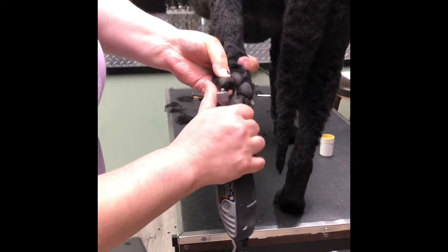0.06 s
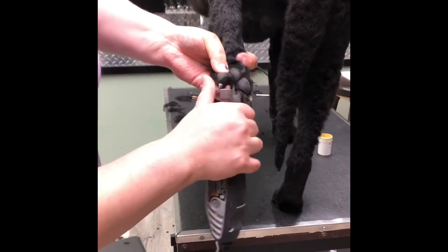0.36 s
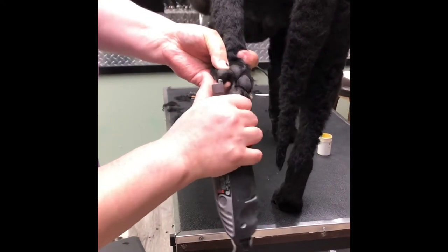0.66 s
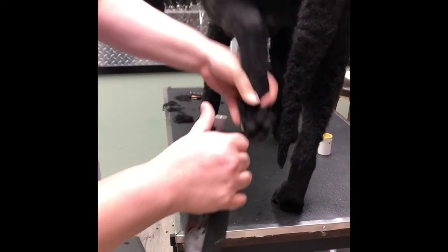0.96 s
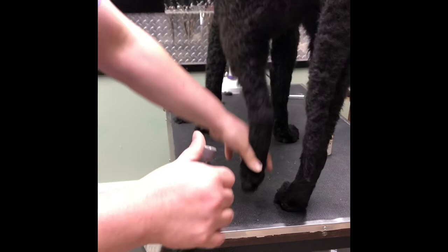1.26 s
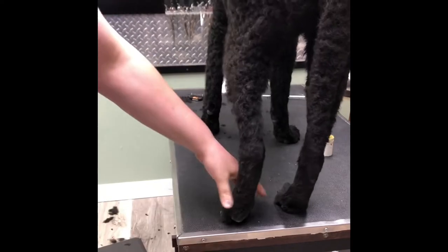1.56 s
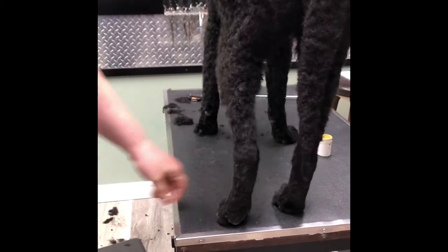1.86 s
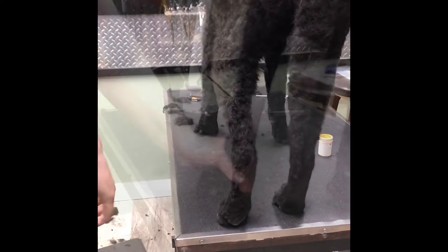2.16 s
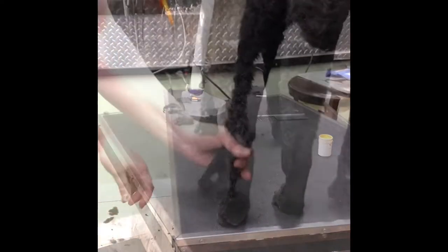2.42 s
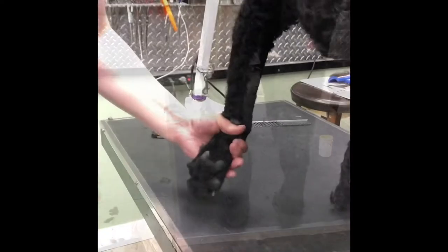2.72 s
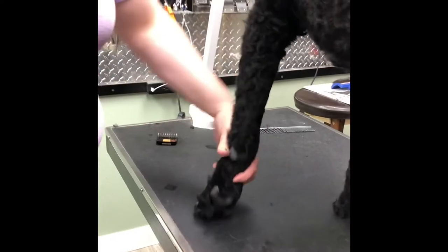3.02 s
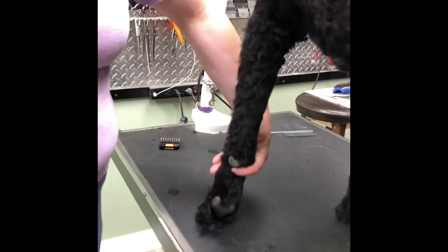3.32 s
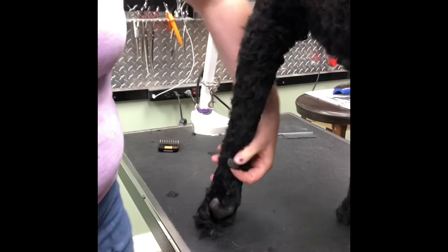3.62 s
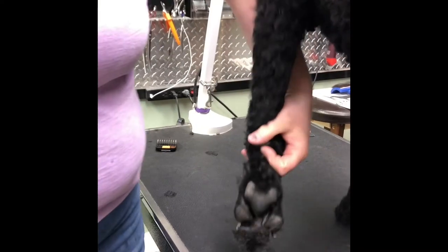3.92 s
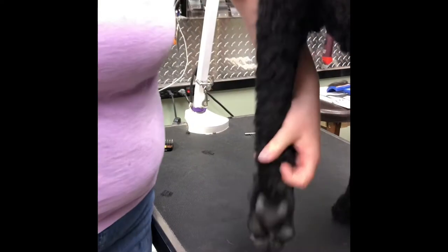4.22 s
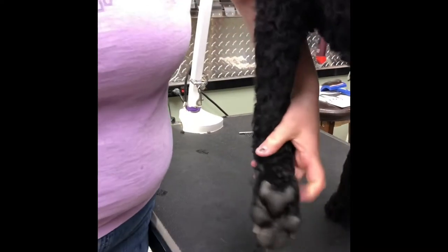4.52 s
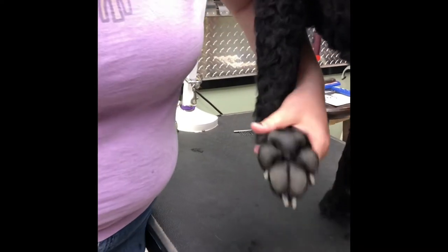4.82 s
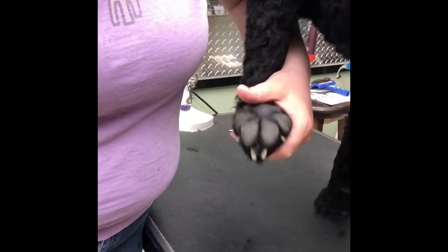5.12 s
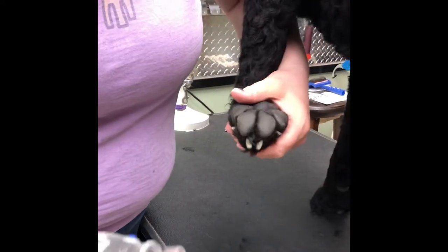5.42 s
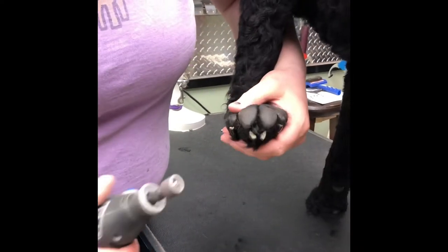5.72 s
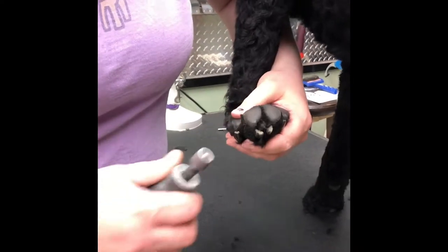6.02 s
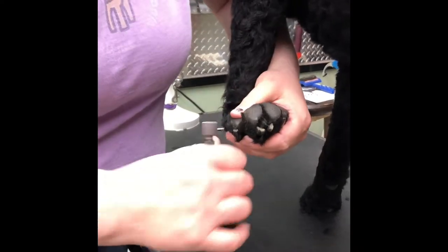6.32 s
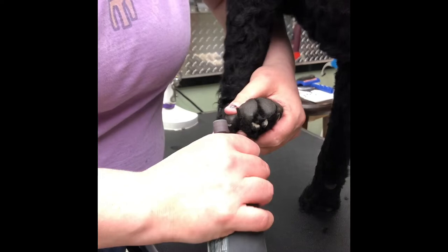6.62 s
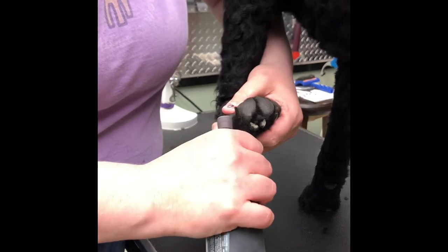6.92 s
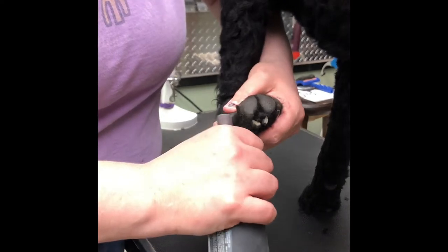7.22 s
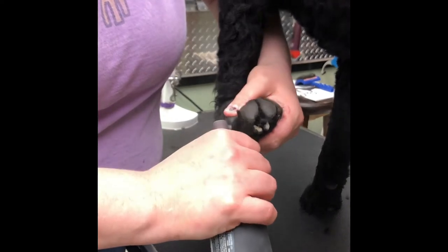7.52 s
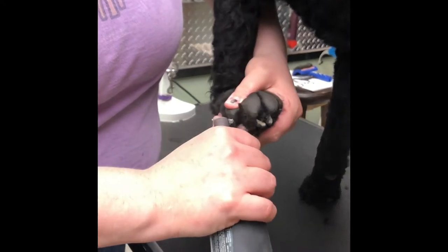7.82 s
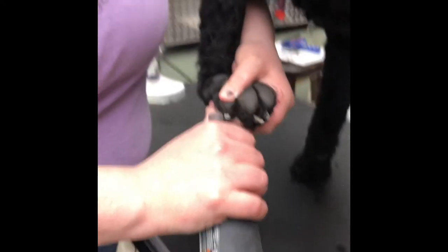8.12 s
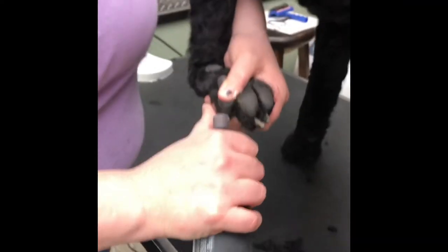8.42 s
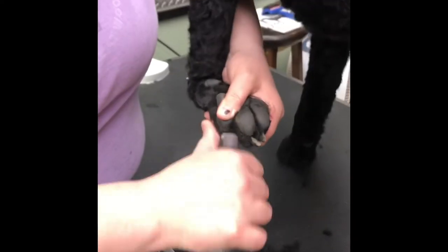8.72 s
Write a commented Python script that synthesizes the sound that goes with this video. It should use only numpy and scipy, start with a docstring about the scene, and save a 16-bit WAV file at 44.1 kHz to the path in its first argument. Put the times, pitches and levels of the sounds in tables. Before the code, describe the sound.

A handheld rotary grinder whines against a dog's nails, coasts into silence, then judders up to a higher speed and files again.

```python
"""A handheld rotary grinder files a dog's nails, close by, over the low hum of a room. From the start its shaft
hums and its fan hisses and whines; the sanding drum rasps, squeals and slows as it meets a nail. Near 2 s it is
switched off and coasts down as its sound fades away. A paw shifts on the grooming table, with a few small
ticks. At 5.2 s the motor judders up to a higher speed, and from about 7 s the drum files again, pressed harder."""
import sys
import numpy as np
from scipy import signal
from scipy.fft import rfft, irfft
from scipy.io import wavfile

SR = 44100
rng = np.random.default_rng(int(sys.argv[2]) if len(sys.argv) > 2 else 0)


def dump_mix(stems):
    """Bounce the given channels to the path in sys.argv[1] as a 16-bit WAV at rate SR."""
    frames = np.atleast_2d(stems).T  # one column per channel
    limited = np.clip(frames, -1, 1)  # hard clip at full scale
    pcm = np.round(limited * 32767).astype(np.int16)
    wavfile.write(sys.argv[1], SR, pcm)


N = 395136
TIME = np.arange(N) / SR
FREQS = np.fft.rfftfreq(N, 1 / SR)


def amp(db):
    """Turns decibels into a gain to multiply by."""
    return 10 ** (np.asarray(db) / 20)


def unit(x):
    """Scales a signal to an average strength (rms) of one."""
    return x / np.sqrt(np.mean(x ** 2) + 1e-20)


def curves(rows):
    """Joins the rows of a timed table with straight lines, one curve a column."""
    times, *columns = np.transpose(rows)
    return [np.interp(TIME, times, column) for column in columns]


def shape(points):
    """A gain for every frequency, drawn through points of f/Hz, level/dB."""
    hz, db = np.transpose(points)
    return amp(np.interp(np.log(FREQS + 1), np.log(hz), db))


def above(hz, order=8):
    """Gains that let through what lies above hz; a higher order cuts more sharply."""
    return 1 / np.sqrt(1 + (hz / (FREQS + 1)) ** (2 * order))


def noise(gain):
    """Noise coloured by a gain for each frequency."""
    return unit(irfft(gain * rfft(rng.standard_normal(N)), N))


def drift(rate_hz):
    """A smooth random wiggle that changes about rate_hz times a second."""
    steps = signal.lfilter(*signal.butter(3, rate_hz, fs=2000), rng.standard_normal(20000))
    return unit(np.interp(TIME, np.linspace(-1, 9, len(steps)), steps))


def tone(cycles, unsteady, rate_hz):
    """A wavering tone from a running count of cycles; very unsteady, it becomes a band of noise."""
    angle = 2 * np.pi * (cycles + rng.random())
    steady_part = (1 + unsteady * drift(rate_hz)) * np.cos(angle)
    return unit(steady_part + unsteady * drift(rate_hz) * np.sin(angle))


def swell(t, length):
    """A smooth rise and fall with its middle at time t."""
    out = np.zeros(N)
    inside = slice(*np.searchsorted(TIME, [t - length / 2, t + length / 2]))
    out[inside] = np.cos(np.pi * (TIME[inside] - t) / length) ** 2
    return out


def swells(rows):
    """Adds up swells from rows of t/s, length/s, height."""
    return sum(height * swell(t, length) for t, length, height in rows)


# machines humming on mains power: f/Hz, level/dB, unsteadiness (0-1)
MAINS_HUM = [(55.8, -50.5, 0.6), (117.2, -48.5, 0.28), (234.2, -59, 0.03), (352, -61, 0.24),
             (482, -64.5, .6), (608, -65.5, 0.3)]
# colour of the ventilation: f/Hz, level/dB
VENTILATION = [(28, -43.5), (50, -16.5), (130, -9.5), (175, -14), (300, -12.5), (500, -13.5), (900, -19.5),
               (1500, -24), (3700, -30), (6400, -40), (15500, -49)]
def room_tone(ventilation_db=-52, low_cut_hz=46):
    """Machines hum and ventilation blows all the way through, with no deep rumble."""
    hum = sum(amp(db) * tone(hz * TIME, unsteady, rate_hz=11) for hz, db, unsteady in MAINS_HUM)
    ventilation = amp(ventilation_db) * noise(shape(VENTILATION))
    return irfft(rfft(hum + ventilation) * above(low_cut_hz, order=10), N)


# shaft speeds are in Hz, meaning turns a second
WORKING_HZ = 477
SWITCH_OFF_S, SWITCH_ON_S, SETTLE_S = 1.931, 5.2, 0.649
def free_speed(start_hz=399.5, set_hz=473.8, top_hz=556.4, creep_s=1.15, coast_s=2.073,
               kick_share=0.331, kick_s=0.272):
    """With no nail to brake it, the shaft creeps up, coasts down, then restarts with a quick kick."""
    powered = set_hz + (start_hz - set_hz) * np.exp(-np.minimum(TIME, SWITCH_OFF_S) / creep_s)
    first_run = powered * np.exp(-np.maximum(TIME - SWITCH_OFF_S, 0) / coast_s)
    t = np.maximum(TIME - SWITCH_ON_S, 0)
    kick_left = kick_share * np.exp(-(t / kick_s) ** 2)
    settling_left = (1 - kick_share) * np.exp(-t / SETTLE_S)
    return np.where(TIME < SWITCH_ON_S, first_run, top_hz * (1 - kick_left - settling_left))


# pitches that the plastic shell and its vents make louder: f/Hz, width/Hz, lift/dB
SHELL_PEAKS = [(1070, 88, 2), (1230, 55, 3), (2314, 120, 0), (3550, 220, 3.5), (4600, 140, 1.5),
               (5700, 260, 2.5), (6740, 69, 2), (8900, 350, 1.5), (11600, 270, 1.5), (14750, 500, 5.5)]
def shell(hz):
    """The gain the shell gives a sound at hz, highest near its own resonances."""
    grid_hz = np.arange(0, SR // 2, 10)
    lift_db = sum(db / (1 + ((grid_hz - peak) / width) ** 2) for peak, width, db in SHELL_PEAKS)
    return np.interp(hz, grid_hz, amp(lift_db))


# cooling air at working speed, shifting as the tool moves: t/s, rush/dB, hiss/dB, roar/dB
# (the high hiss and the low roar are counted from the rush)
AIR_LEVELS = [(0, -29, -1.5, -4), (1.24, -28.5, -4, -6.5), (1.66, -26.5, 1.7, -5), (2.28, -24, -1.2, -7),
              (2.7, -26, -2.5, -6.5), (5.34, -26, -8.5, -12.5), (5.6, -27, 2, -5.5), (5.78, -23.5, 1, -9),
              (6.04, -24.5, -1, -8), (6.13, -25.5, 2, -7.5), (6.33, -26, 2.5, -4.5),
              (6.92, -25, -1.5, -5.5), (7.7, -26, -1, -4.5), (8.05, -24, -3.5, -6.5), (8.9, -26.5, 0, -6)]
# colour of that air: f/Hz, level/dB
AIR_COLOUR = [(150, -21.5), (600, -11.5), (1000, -3.5), (1750, -5.5), (3000, -4.5), (4200, -3), (6200, 1),
              (7500, 0.5), (10000, -2), (15500, -5.5)]
def airflow(speed, turns, speed_power=1.41, throb=0.26, flutter_db=0.76):
    """Air swirls from the vents, throbbing each turn. Returns its sound and its strength, the rush."""
    rush_db, hiss_db, roar_db = curves(AIR_LEVELS)
    rush = amp(rush_db) * (speed / WORKING_HZ) ** speed_power
    colour = shape(AIR_COLOUR) * shell(FREQS)
    over_roar, over_middle = above(hz=2290), above(hz=10200)
    roar = amp(roar_db - 3) * noise(colour * np.sqrt(1 - over_roar ** 2))
    middle = amp(-0.48) * noise(colour * over_roar * np.sqrt(1 - over_middle ** 2))
    hiss = amp(hiss_db) * noise(colour * over_middle)
    pulsing = (1 + throb * np.cos(2 * np.pi * turns)) * amp(flutter_db * drift(69.5))
    return rush * (roar + middle + hiss) * pulsing, rush


# hum of the shaft, which the shell gives off poorly at low speed: speed/Hz, level/dB
SHAFT_HUM = [(150, -74), (255, -47), (345, -51), (392, -31.5), (520, -31.5)]
# the hum swells and dips as the hand turns the tool: t/s, length/s, change/dB
HUM_CHANGES = [(1.12, 0.51, 4), (1.43, 0.18, -16), (1.57, 0.6, -9.5), (1.99, 0.077, -17), (5.8, .12, 5.5),
               (5.92, 0.21, -5.5), (6.33, 0.38, 4.5), (6.63, 0.38, -6), (6.83, 0.18, -16), (7.13, .25, 3.5),
               (7.95, 0.11, -6), (8.46, .2, 3.5)]
# a slow, a medium and a fast shaft: speed/Hz
THREE_SPEEDS = [382, 419, 535]
# higher tones, counted from the rush at those speeds: cycles a turn, slow/dB, medium/dB, fast/dB
# (whole numbers of cycles come from the shaft, the others from the ball bearings)
ROTOR_TONES = [(2, -24, -18, -14), (3, -22.5, -16.5, -19), (4, -33, -19, -32), (4.56, -37, -38, -7.5),
               (5, -23.5, -23.5, -28.5), (5.66, -33, -21, -34.5), (6.09, -20, -12, -14.5),
               (7.66, -13.5, -18.5, -34), (8, -20, -18, -19), (9.66, -19, -18, -16.5),
               (11.2, -17.5, -44, -18), (11.66, -30, -20, -10), (13, -24, -21.5, -14.5),
               (13.2, -27, -17, -25.5), (16, -33, -25, -22), (17, -19, -16, -20), (19, -18, -19, -23)]
def rotor(speed, turns, rush):
    """The unbalanced shaft hums, one cycle a turn; higher tones swell as they pass a shell peak."""
    hum_db = np.interp(speed, *np.transpose(SHAFT_HUM)) + swells(HUM_CHANGES)
    out = amp(hum_db) * tone(turns, unsteady=0.0504, rate_hz=15)
    for per_turn, *levels_db in ROTOR_TONES:
        level = amp(np.interp(speed, THREE_SPEEDS, levels_db)) * shell(per_turn * speed)
        out += rush * level * tone(per_turn * turns, unsteady=0.299, rate_hz=9)
    return out


# the whine flares when a vent points at the listener: t/s, length/s, lift/dB
WHINE_FLARES = [(1.55, 0.18, 8), (1.74, 0.048, 4.5), (1.93, 1, 7.5), (2.58, 0.58, 4.5), (5.76, 0.21, 10.5),
                (6.02, 0.32, 11), (6.25, 0.096, 8.5), (8.62, 0.19, 6)]
def fan(speed, turns, rush, blades=18, whine_db=-2.5, cutoff_hz=3000, flutter_db=2.5):
    """Passing blades whine; so short a sound wave flutters with each tremor of the hand."""
    passes = blades * turns
    whine = tone(passes, unsteady=0.11, rate_hz=17)
    fuzz = amp(-16) * tone(passes, unsteady=4.6, rate_hz=135)
    octave = amp(-17) * tone(2 * passes, unsteady=0.4, rate_hz=25)
    tremor = unit(amp(flutter_db * drift(21)))
    escaping = np.minimum(blades * speed / cutoff_hz, 1) ** 2
    return rush * escaping * amp(whine_db + swells(WHINE_FLARES)) * (tremor * whine + fuzz + octave)


# the low and the high ring of the housing: f/Hz, width/Hz
HOUSING_RINGS = [(3430, 350), (7120, 360)]
def housing(speed, pull, levels_db=(-32.5, -34.5), speed_power=0.94):
    """The motor's rubbing brushes make the housing ring while the shaft speeds up or runs down."""
    drive = np.minimum(abs(pull), 1) * (speed / WORKING_HZ) ** speed_power
    bands = [noise(1 / (1 + ((FREQS - hz) / width) ** 2)) for hz, width in HOUSING_RINGS]
    return drive * sum(amp(db) * band for db, band in zip(levels_db, bands))


# the drum is pressed on a nail: t/s, length/s, braking/(Hz/s)
NAIL_PRESSES = [(.2, .24, 73), (.62, .16, 115), (6.88, .23, 197), (7.01, .23, 283), (7.23, .23, 300),
                (7.36, .19, 432), (7.62, .49, 268), (7.93, .26, 206), (8.25, .21, 162), (8.66, .29, 155)]
def nail_drag():
    """A nail brakes the drum. Returns the braking and the lost speed, which the motor wins back."""
    braking = swells(NAIL_PRESSES)
    lost_hz = signal.lfilter([1 / SR], [1, -np.exp(-1 / (SETTLE_S * SR))], braking)
    return braking, lost_hz


# the drum just grazes a nail: t/s, length/s, level/dB
NAIL_GRAZES = [(0.06, 0.098, -30), (0.25, .16, -31), (.616, .057, -19.5), (8.686, 0.18, -32),
               (8.753, .06, -18)]
# colour of grit on a nail: f/Hz, level/dB
GRIT_COLOUR = [(1500, -15), (2700, -3), (4000, -5), (6000, 4), (10000, -9.5), (15500, 2)]
def nail_filing(turns, braking, overtones=39, sharpness=5, repeat_share=0.18, rasp_db=-25):
    """A light touch catches the drum's high spot once a turn; pressed down, all its grit rasps."""
    # the same grains come round every turn, so the grit sounds as overtones of the shaft
    spin = np.exp(2j * np.pi * turns)
    weights = np.exp(2j * np.pi * rng.random(overtones)) * rng.uniform(0.4, 1, overtones)
    grit = np.polyval(weights, spin).real
    grit_spectrum = rfft(grit * (1 + 0.16 * drift(120)))
    rasp = unit(irfft(grit_spectrum * shape(GRIT_COLOUR) * above(hz=1400, order=4), N))
    pressure = (braking / 370) ** 0.62  # a firm press brakes by 370 Hz/s
    high_spot = np.exp(sharpness * (spin.real - 1))
    treble = above(hz=12000, order=5)
    scratch = unit(high_spot * noise(treble))
    buzz = unit(irfft(grit_spectrum * treble, N))
    graze = np.sqrt(1 - repeat_share) * scratch + np.sqrt(repeat_share) * buzz
    touch = swells((t, length, amp(db)) for t, length, db in NAIL_GRAZES)
    return touch * graze + amp(rasp_db) * pressure * rasp


# short squeals: t/s, length/s, level/dB, list of tones in cycles a turn
NAIL_SQUEALS = [(.2, .2, -42, [4, 5]), (.6, .13, -37, [5, 37]), (6.98, .17, -33, [3, 5, 10]),
                (7.27, .15, -32.5, [4, 20, 22, 26]), (7.34, .16, -31.5, [12, 16, 20, 23, 26]),
                (7.66, .18, -35, [4, 6, 16, 24]), (8.67, .07, -27, [29])]
def squeals(turns, boost_db=1, unsteady=0.42):
    """The nail sticks and slips in step with the turning drum."""
    out = np.zeros(N)
    for t, length, db, tones in NAIL_SQUEALS:
        chord = sum(np.cos(2 * np.pi * (per_turn * turns + rng.random())) for per_turn in tones)
        out += amp(db) * swell(t, length) * chord
    return amp(boost_db) * np.sqrt(2) * out * unit(1 + unsteady * drift(47))


# gliding bands of air noise: t/s, length/s, level/dB, start f/Hz, end f/Hz
VENT_SWISHES = [(1.5, 0.41, -33, 5560, 4020), (1.665, 0.13, -30.5, 3525, 2196),
                (1.715, 0.58, -28.5, 5700, 6730), (5.867, 0.1, -19.5, 7700, 7970),
                (5.901, .4, -28.5, 3900, 5300)]
def swishes():
    """The jet from the vent sweeps past hand and table as the tool is swung."""
    out = np.zeros(N)
    for t, length, db, start_hz, end_hz in VENT_SWISHES:
        hz = np.interp(TIME, [t - length / 2, t + length / 2], [start_hz, end_hz])
        out += amp(db) * swell(t, length) * tone(np.cumsum(hz) / SR, unsteady=13.3, rate_hz=773)
    return out


# the paw slides: t/s, length/s, level/dB, share of hollow table sound (0-1)
PAW_SCUFFS = [(2.792, .04, -44, 0.9), (3.04, 0.13, -64, 0.1), (3.216, 0.31, -59, 0.1),
              (3.34, 0.15, -51, 0.06), (3.448, 0.093, -60.5, 0), (3.683, 0.32, -52, 0.2),
              (3.726, 0.074, -46.5, 0.3), (3.756, 0.055, -39, 0.98), (4.822, 0.2, -65, 0)]
# colours of rubbed fur and of the hollow table: f/Hz, level/dB
FUR_COLOUR = [(250, -11), (1000, 2), (4500, 4), (7000, 1.5), (11000, -2.5), (15500, -3.5)]
TABLE_COLOUR = [(150, -14.5), (300, 0), (800, -14.5), (1150, 1.5), (1500, -2), (1900, -14), (3200, -16),
                (8000, -41)]
def paw_scuffs(grain_db=0.5):
    """Fur and paw pads rub over the hand and the table's mat with a slightly grainy sound."""
    grain = amp(grain_db * drift(250))
    fur = unit(grain * noise(shape(FUR_COLOUR)))
    table = unit(grain * noise(shape(TABLE_COLOUR)))
    return sum(amp(db) * swell(t, length) * (np.sqrt(1 - hollow) * fur + np.sqrt(hollow) * table)
               for t, length, db, hollow in PAW_SCUFFS)


# small dry ticks: t/s, peak level/dB, fade/s (the time to fall by 60 dB)
SMALL_TICKS = [(3.439, -43, .04), (4.039, -49, .03), (4.15, -44, .015), (4.379, -52, .06),
               (5.129, -42, .04), (5.234, -45, .04)]
def ticks():
    """Claws and the speed dial click: each is a burst of bright noise that dies quickly."""
    snap = noise(above(hz=3000, order=2)) / 3  # peaks near one
    return sum(amp(db - 60 * np.clip((TIME - t) / fade, 0, 3)) * (TIME >= t) * snap
               for t, db, fade in SMALL_TICKS)


# rough tones of the straining motor: cycles a turn, level/dB
JUDDER_TONES = [(8.1, -5), (13.1, -13), (16.4, -3), (23, -8), (27, -9)]
def judder(speed, turns, rush, pull, level_db=-2.5, cutoff_hz=1500, ring_lift_db=7):
    """The motor shakes as it speeds up hard; each rising tone chirps as it passes a housing ring."""
    out = np.zeros(N)
    for per_turn, db in JUDDER_TONES:
        hz = per_turn * speed
        lift_db = sum(ring_lift_db / (1 + ((hz - ring) / width) ** 2) for ring, width in HOUSING_RINGS)
        escaping = np.minimum(hz / cutoff_hz, 1) ** 4  # a small shell gives off little bass
        rough = tone(per_turn * turns, unsteady=1.1, rate_hz=150)
        out += amp(db + lift_db) * shell(hz) * escaping * rough
    strain = np.clip(2 * pull - 1, 0, 1)
    return rush * amp(level_db) * strain * out


def room_echo(x, fade_s=0.46, echo_db=-13):
    """The hard walls of a small room add a short, slightly dull tail."""
    t = TIME[:SR // 2]
    dull_noise = signal.lfilter([1], [1, -0.6], rng.standard_normal(len(t)))
    tail = dull_noise * amp(-60 * t / fade_s) * (t > 0.004)
    return amp(echo_db) * signal.fftconvolve(x, tail / np.linalg.norm(tail))[:N]


def scene(wobble=0.00043, fade_out_s=(1.77, 2.93)):
    """One shaft speed drives motor, fan and drum; both ears hear the same mix."""
    free = free_speed()
    braking, lost_hz = nail_drag()
    speed = np.maximum(free - lost_hz, 1) * (1 + wobble * drift(25))
    turns = np.cumsum(speed) / SR
    pull = np.gradient(free) * SR / 395  # 1 is a hard pull, gaining 395 Hz/s
    air, rush = airflow(speed, turns)
    tool = air + swishes() + rotor(speed, turns, rush) + fan(speed, turns, rush)
    tool += judder(speed, turns, rush, pull) + housing(speed, pull)
    # the tool's sound fades away to silence until it is switched on again
    fade = np.where(TIME < SWITCH_ON_S, np.interp(TIME, fade_out_s, [1, 0]), 1)
    contacts = nail_filing(turns, braking) + paw_scuffs() + ticks()
    mono = fade * tool + squeals(turns) + contacts + room_echo(contacts) + room_tone()
    return np.array([mono, mono])


def record(dry, cutoff_hz=15800):
    """Takes away the very highest treble."""
    low_pass = signal.firwin(511, cutoff_hz, window=("kaiser", 9), fs=SR)
    return signal.oaconvolve(dry, low_pass[None], "same")


dry = scene()
out = record(dry)
dump_mix(out)
```